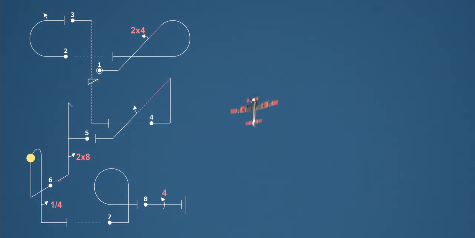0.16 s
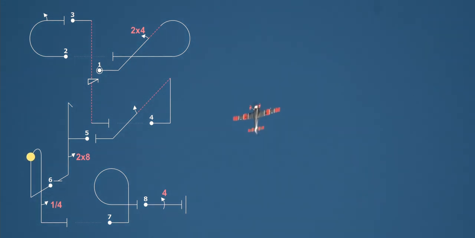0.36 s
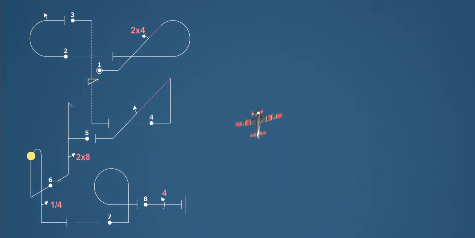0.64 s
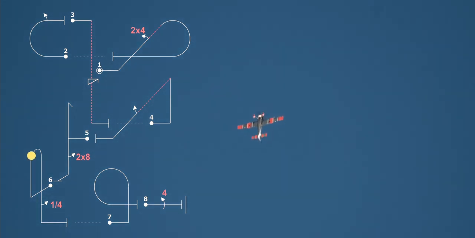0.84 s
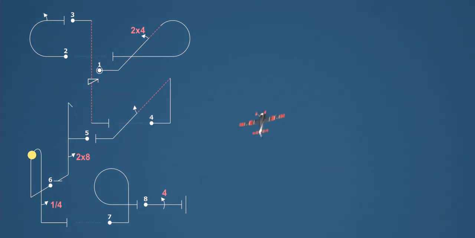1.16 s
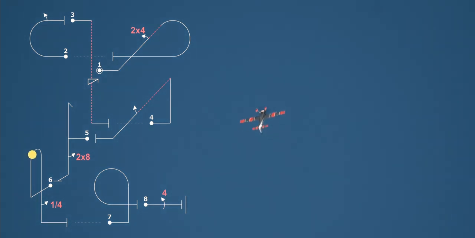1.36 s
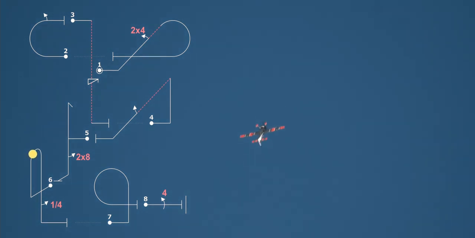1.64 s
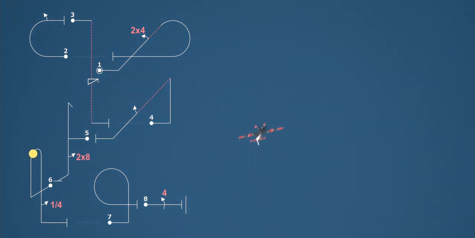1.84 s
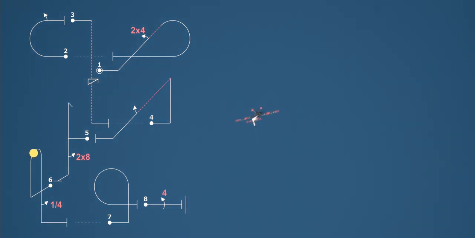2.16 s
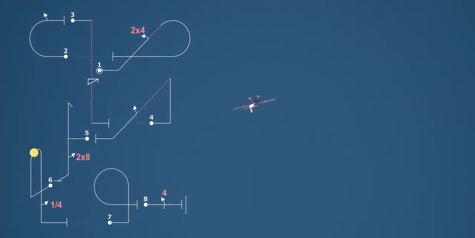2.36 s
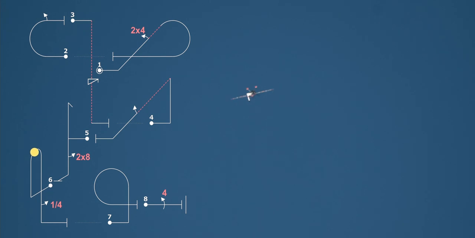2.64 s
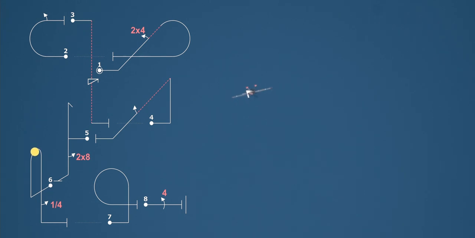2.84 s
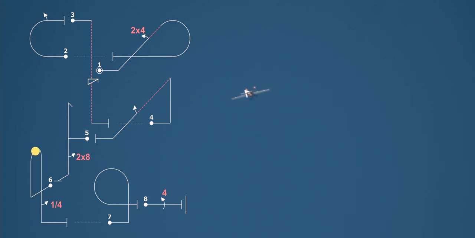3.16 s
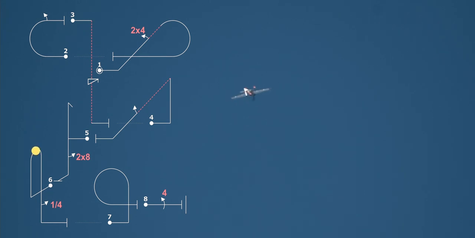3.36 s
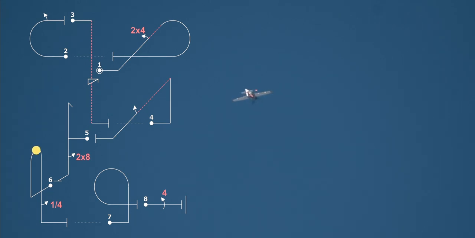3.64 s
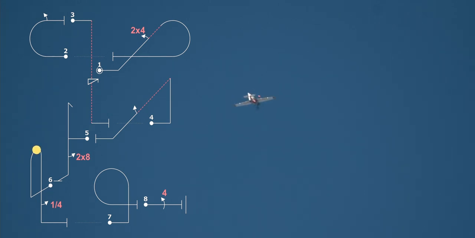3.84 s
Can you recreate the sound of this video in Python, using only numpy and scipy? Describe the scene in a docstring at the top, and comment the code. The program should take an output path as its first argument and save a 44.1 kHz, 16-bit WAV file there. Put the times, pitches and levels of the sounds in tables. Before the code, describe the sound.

A small propeller plane buzzes loudly overhead, its pitch sinking. As it turns and flies away, the buzz softens into a throbbing engine drone with swells of rasping air. It is heard from the ground outdoors, over faint wind.

```python
"""A loud three-blade propeller buzz, sinking in pitch: a small aerobatic plane pulls over and flies away.
As its tail turns towards us, high in open sky, the six-cylinder exhaust throbs through.
Engine roar and the rasp of the propeller wash pulse with the firings, under an airy treble.
Moving air makes the harmonics fade and the wash swell; faint wind and hiss lie below."""
import sys
import numpy as np
from scipy import signal
from scipy.fft import rfft, irfft, next_fast_len
from scipy.io import wavfile
from scipy.ndimage import uniform_filter1d, map_coordinates

SR = 44100
rng = np.random.default_rng(int(sys.argv[2]) if len(sys.argv) > 2 else 0)


def dump_mix(stems):
    """Bounce the given channels to the path in sys.argv[1] as a 16-bit WAV at rate SR."""
    frames = np.atleast_2d(stems).T  # one column per channel
    limited = np.clip(frames, -1, 1)  # hard clip at full scale
    pcm = np.round(limited * 32767).astype(np.int16)
    wavfile.write(sys.argv[1], SR, pcm)


N = 176400

# the six firings of one engine cycle: place_intervals, strength
CYLINDERS = [(.28, .44), (1.12, 0.4), (2.31, 0.47), (3.14, 0.46), (4, 0.38), (4.95, 0.52)]
BLADE_PLACE = 0.078  # where the blade pulse falls, in firing intervals
TURN_START_S, TURN_END_S = 1.7, 2.45  # the tail swings towards us
TOP_HZ = 15760


def amp(db):
    """Decibels to gain."""
    return 10 ** (np.asarray(db) / 20)


def unit(x):
    """Scale to rms 1."""
    return x / np.sqrt(np.mean(x ** 2) + 1e-20)


def along(points, hz):
    """Read (freq_hz, value) points on a log frequency axis."""
    freqs, values = np.transpose(points)
    return np.interp(np.log(hz + 1), np.log(freqs + 1), values)


def curve(rows):
    """Draw (time_s, value) points as one value per sample."""
    return np.interp(np.arange(N) / SR, *np.transpose(rows))


def wobble(rate_hz):
    """A smooth random curve, rate_hz knots a second."""
    return map_coordinates(rng.standard_normal(400), [np.arange(N) * rate_hz / SR], mode="mirror")


def filtered(x, response):
    """Shape x with a gain that depends on frequency."""
    size = next_fast_len(N + SR // 4)
    return irfft(rfft(x, size) * response(np.fft.rfftfreq(size, 1 / SR)), size)[..., :N]


def crossfade(early, late, start_s, end_s):
    """Equal-power blend from one noise to another."""
    angle = np.pi / 2 * curve([(start_s, 0), (end_s, 1)])
    return np.cos(angle) * early + np.sin(angle) * late


def rush(tone, patchy_db):
    """Coloured stereo noise of rms 1, with patches of random gain in time and frequency."""
    # stereo image, wider in the treble: freq_hz, left_right_likeness
    likeness = [(400, 1), (700, 0.8), (1300, 0.91), (1600, .7), (2000, 0.52), (2300, 0.088), (12000, .2)]
    spectra = signal.stft(rng.standard_normal((2, N)), nperseg=1024)[2]
    patches = uniform_filter1d(rng.standard_normal(spectra.shape[1:]), size=4, axis=0)
    patches = uniform_filter1d(patches, size=10, axis=1)
    noise = signal.istft(spectra * amp(patchy_db * unit(patches)), nperseg=1024)[1][:, :N]

    def mid_side_gains(hz):
        width = np.arccos(np.clip(along(likeness, hz), -1, 1)) / 2
        return amp(along(tone, hz)) * [np.cos(width), np.sin(width)]

    mid, side = filtered(noise, mid_side_gains)
    return unit(np.array([mid + side, mid - side]))


def partial(phase, level_db, hz):
    """One partial heard through moving air: the higher it is, the more it fades, wanders and lags."""
    fade_db, wander_rad, lag_rad = 2.6, 0.75, 3.28  # at 1 kHz
    low_cut_hz = 308.4  # the microphone's low cut advances the phase of partials below it
    khz_squared = (hz / 1000) ** 2
    fade = amp(fade_db * np.minimum(khz_squared, 1) * wobble(10))
    wander = wander_rad * (wobble(13) + .5 * wobble(60))
    shift = (low_cut_hz / hz) ** 2 + khz_squared * (wander - lag_rad)
    return np.sqrt(2) * amp(level_db) * fade * np.cos(phase + shift)


def propeller(firings, firing_hz):
    """Blade pulses buzz as nine harmonics in step, dying down as the plane turns away."""
    # envelope of each harmonic: time_s, level_db
    first = [(0, -28.5), (.15, -27.5), (.4, -28.5), (.67, -32), (.85, -36), (1.05, -44), (1.4, -50.5),
             (3.5, -51.5), (4, -54)]
    second = [(0, -29.5), (0.351, -28.5), (.6, -23), (.95, -25), (1.25, -31.5), (1.5, -33.5), (1.7, -37),
              (2.2, -35.5), (2.6, -38), (3.05, -39.5), (3.35, -44.5), (3.65, -40), (4, -44.5)]
    third = [(0, -26.5), (.12, -20), (0.321, -17), (.41, -26), (0.539, -17), (.7, -21), (.88, -24.5),
             (1.07, -32), (1.17, -50), (1.35, -37), (2.1, -45), (2.45, -36), (2.68, -35.5), (3.2, -46),
             (3.75, -32.5), (4, -37)]
    fourth = [(0, -35), (0.171, -27.5), (.28, -26), (.42, -34), (0.799, -34.5), (1, -36.5), (1.25, -56),
              (1.5, -48), (2.2, -51.5), (3, -43.5), (3.6, -40.5), (3.8, -37), (4, -40.5)]
    fifth = [(0, -41), (.14, -31), (.23, -34), (.3, -49.5), (.45, -38.5), (.58, -30.5), (.65, -43.5),
             (.78, -39.5), (1, -56.5)]
    sixth = [(0, -32), (0.201, -26), (.26, -33), (.52, -30.5), (.64, -39.5), (.86, -40.5), (.97, -54),
             (1.35, -46.5), (1.55, -41.5), (1.8, -50.5), (2.1, -44.5), (3.2, -48.5), (3.5, -43.5), (4, -46)]
    seventh = [(0, -27), (.06, -39), (.11, -24.5), (.24, -32.5), (.29, -39.5), (.5, -33.5), (.57, -37.5),
               (.68, -48), (1.1, -66)]
    eighth = [(0, -35), (.07, -44.5), (.13, -30), (0.219, -33.5), (.3, -49.5), (.6, -58.5)]
    ninth = [(0, -37), (.14, -39.5), (.33, -53), (.49, -52), (0.559, -36), (.7, -53), (1.3, -57.5),
             (2.4, -56)]
    envelopes = [first, second, third, fourth, fifth, sixth, seventh, eighth, ninth]
    # the exhaust takes over the third harmonic, nearly out of step with the blades
    handover_cycles = curve([(1.1, 0), (1.3, .45)])
    buzz = np.zeros(N)
    for harmonic, envelope in enumerate(envelopes, 1):
        cycles = harmonic * (firings - BLADE_PLACE) - handover_cycles * (harmonic == 3)
        buzz += partial(2 * np.pi * cycles, curve(envelope), harmonic * firing_hz)
    return buzz


def puffs(firings, depth):
    """A gain of steady mean power that swells at each firing, more for the stronger cylinders."""
    lead = 0.25  # firing intervals ahead of the blade pulse
    place, strength = np.transpose(CYLINDERS)
    size = np.interp(firings, place, strength, period=len(place))
    evenness = curve([(0, 1), (TURN_START_S, 0)])
    size += (strength.mean() - size) * evenness
    gain = 1 + depth * size * np.cos(np.pi * (firings - BLADE_PLACE + lead)) ** 4
    return gain / np.sqrt(uniform_filter1d(gain ** 2, size=SR // 10))


def engine_roar(firings):
    """Low, rough engine noise that pulses with the firings."""
    # envelope: time_s, level_db
    envelope = [(0, -35), (.6, -31.5), (1, -36.5), (1.4, -39.5), (2.1, -39), (2.6, -38.5), (3.2, -40),
                (4, -44)]
    # colour: freq_hz, relative_db
    tone = [(20, -64), (60, -23), (100, -10), (140, -5), (200, 0.5), (250, -4), (300, -3), (370, 6),
            (430, -6.5), (510, -3.5), (620, -24), (750, -25.5), (1000, -27.5), (2000, -60), (5000, -120)]
    return amp(curve(envelope)) * rush(tone, patchy_db=1.45) * puffs(firings, depth=0.52)


def air_swells(wash):
    """Moving air focuses the wash: gliding bands swell, or now and then dip, for a moment."""
    # peak_s, half_length_s, centre_hz, half_width_octaves, glide_octaves_per_s, gain_db
    swells = [(0.146, 0.04, 1700, 1, -4, 8.5), (0.422, 0.12, 1610, 0.32, 0.5, -4),
              (0.541, 0.036, 1150, 0.12, 3.5, 11), (0.578, 0.058, 1150, 0.97, 0.5, 8),
              (0.626, .035, 1394, 0.056, -3.5, 13.5), (0.826, 0.097, 973, 0.23, 5, 8),
              (0.992, 0.093, 1326, .7, -1, 4.5), (1.542, 0.12, 1400, 1, -0.5, 10),
              (2.13, 0.15, 1510, 0.73, .8, 5.5), (2.447, 0.063, 1480, 0.57, 7, 7.5),
              (2.679, 0.064, 1190, 0.7, -1, 10), (2.965, .14, 1430, 0.55, -.24, 9.5),
              (3.37, 0.2, 1037, 1, -4.5, 9), (3.566, .06, 1870, 0.32, -1.9, 10.5),
              (3.665, .05, 1160, 0.26, -2, -8), (3.795, 0.1, 1630, 0.49, -1, 8.3)]
    hz, t, spectra = signal.stft(wash, SR, nperseg=1024)
    gain_db = np.zeros(spectra.shape)
    for peak_s, half_length, centre_hz, half_width, glide, db in swells:
        octaves_off = np.log2((hz[:, None] + 1) / centre_hz) - glide * (t - peak_s)
        gain_db += db * np.exp(-((t - peak_s) / half_length) ** 2 - (octaves_off / half_width) ** 2)
    return signal.istft(spectra * amp(gain_db), nperseg=1024)[1][:, :N]


def propeller_wash(firings):
    """Rasping air chopped by the blades; its colour shifts as the tail turns towards us."""
    # envelope ahead of the swells: time_s, level_db
    envelope = [(0, -33.5), (.35, -37), (.8, -39), (1.25, -43), (1.85, -44), (2.5, -42), (3.2, -43.5),
                (4, -43.5)]
    # colour before and after the turn: freq_hz, relative_db
    early_tone = [(300, -38.5), (520, 1), (900, 0.5), (1050, 1.5), (1200, 0.4), (1430, -3.5), (1550, -10.5),
                  (1700, -10), (1950, -11.5), (2300, -19.5), (2700, -29.5), (4000, -46.5), (8000, -100)]
    tail_tone = [(300, -35), (520, 3), (900, 0), (1040, -1), (1110, -1.5), (1200, -0.5), (1320, -4),
                 (1430, -4), (1520, -8.5), (1600, -4.5), (1700, -15.5), (1950, -10.5), (2300, -19),
                 (2700, -32.5), (4000, -44), (8000, -100)]
    # how hard the blades chop: time_s, depth
    chop = [(0, 6.7), (.25, 2.5), (.6, 1.5), (1.2, 0.82), (4, 0.68)]
    early, tail = rush(early_tone, patchy_db=1.57), rush(tail_tone, patchy_db=2.4)
    rasp = air_swells(crossfade(early, tail, TURN_START_S, TURN_END_S))
    flicker = amp(0.5 * wobble(40) + 0.87 * wobble(12))
    return amp(curve(envelope)) * rasp * puffs(firings, depth=curve(chop)) * flicker


def far_treble():
    """An airy sheen that fades as the plane leaves."""
    # envelope: time_s, level_db
    envelope = [(0, -57.5), (.5, -59.5), (1.15, -61), (1.45, -57), (1.7, -60.5), (2.05, -64), (2.6, -63.5),
                (3.4, -66), (4, -68.5)]
    # early and late colour: freq_hz, relative_db
    early_tone = [(500, -61), (1500, -24), (2400, 5), (2950, -4.5), (3600, -2), (4300, -6.5), (5000, -14),
                  (7000, -27), (14000, -67.5)]
    late_tone = [(500, -54.5), (1500, -25.5), (2400, 6), (2900, 1), (3600, -2.5), (4200, -7.5), (5000, -14),
                 (7000, -28.5), (14000, -68)]
    early, late = rush(early_tone, patchy_db=.4), rush(late_tone, patchy_db=0)
    return amp(curve(envelope)) * crossfade(early, late, start_s=.7, end_s=1.3)


def wind():
    """A faint bed of low wind and hiss."""
    # envelope: time_s, level_db
    envelope = [(0, -65.5), (.6, -62.5), (1.3, -61.5), (4, -61.5)]
    # colour: freq_hz, relative_db
    tone = [(20, 5), (40, 19.5), (65, 25), (200, 11.5), (1000, 1), (3000, 2), (5000, 2), (8000, 1),
            (12000, -1), (15500, -3)]
    return amp(curve(envelope)) * rush(tone, patchy_db=-2.0)


def exhaust(firings, firing_hz):
    """Unequal cylinders add partials at multiples of the engine cycle, which beat into a throb."""
    # partials between the blade harmonics: cycle_multiple, relative_db
    partials = [(8, -20.5), (15, -12), (16, -5.5), (17, -5.5), (19, -7.5), (20, 2), (21, -13), (23, -24.5),
                (25, -20.5), (26, -12.5), (27, -19), (28, -16), (37, -22.5), (38, -18.5), (44, -24)]
    # envelope: time_s, level_db
    envelope = [(0, -49.5), (.5, -55), (.9, -41), (1.2, -45), (1.5, -38), (1.8, -40), (2.05, -35.5),
                (2.25, -40), (2.55, -34), (2.9, -39.5), (3.2, -40), (3.45, -41.5), (3.75, -35), (4, -40)]
    shake_db, shake_rad = 1.65, .14  # unsteady combustion shakes each partial
    place, strength = np.transpose(CYLINDERS)
    level_db, throb = curve(envelope), np.zeros(N)
    for multiple, relative_db in partials:
        ratio = multiple / len(place)
        offset = np.angle(np.sum(strength * np.exp(-2j * np.pi * ratio * place)))
        phase = 2 * np.pi * ratio * firings + offset + shake_rad * wobble(8)
        throb += partial(phase, level_db + relative_db + shake_db * wobble(8), ratio * firing_hz)
    chug_depth = .12 * (1 + .8 * wobble(16))
    chug = np.cos(2 * np.pi * (firings - 6.2) / len(place))  # one swell per engine cycle
    return throb * (1 + chug_depth * chug)


def scene():
    """The plane over faint wind; one firing count keeps blades and engine together."""
    # blade-pass rate, equal to the firing rate, as heard on the ground: time_s, pitch_hz
    pitch = [(0, 140.53), (.25, 135.12), (.6, 128.53), (1, 122.4), (1.35, 118.92), (1.6, 117.84),
             (1.9, 116.88), (2.25, 116.41), (3, 116.29), (3.5, 116.3), (4, 116.74)]
    firing_hz = curve(pitch)
    firings = np.cumsum(firing_hz) / SR
    bed = wind()
    drone = propeller(firings, firing_hz) + exhaust(firings, firing_hz)
    return bed + drone + engine_roar(firings) + propeller_wash(firings) + far_treble()


def record(dry):
    """Cut everything above TOP_HZ."""
    return filtered(dry, lambda hz: hz < TOP_HZ)


dry = scene()
out = record(dry)
dump_mix(out)
```